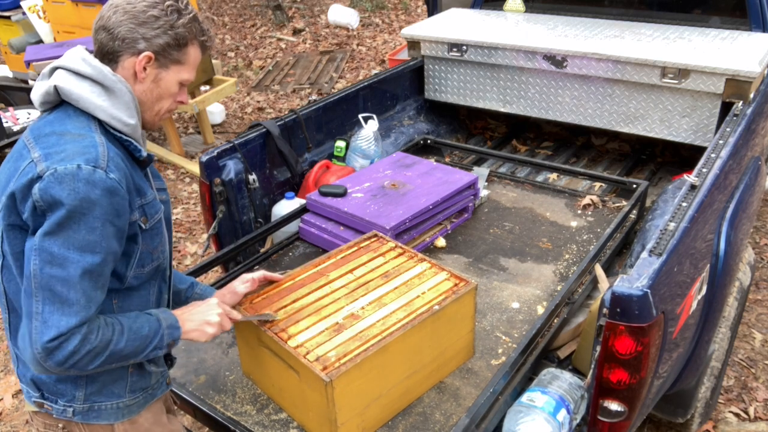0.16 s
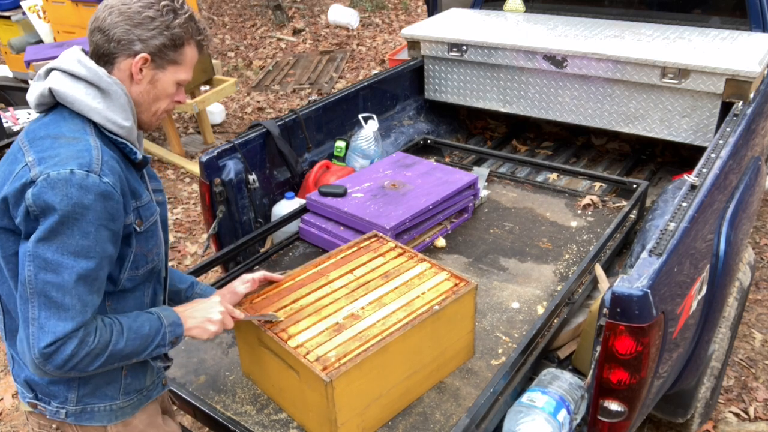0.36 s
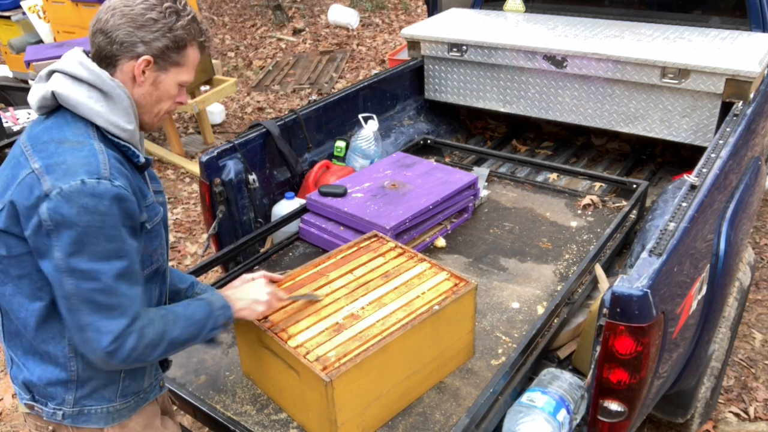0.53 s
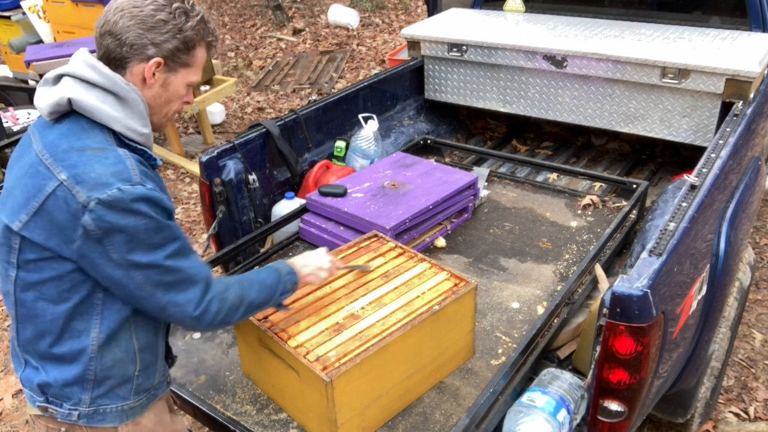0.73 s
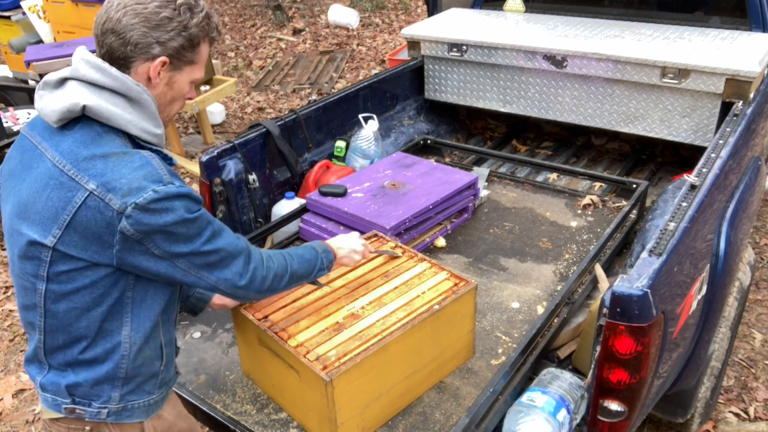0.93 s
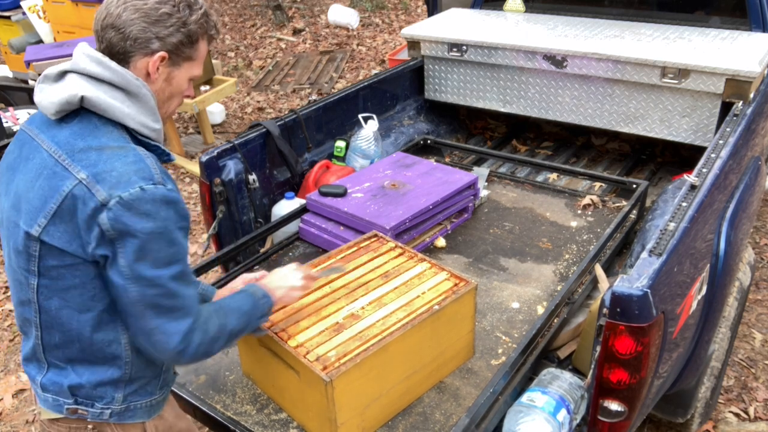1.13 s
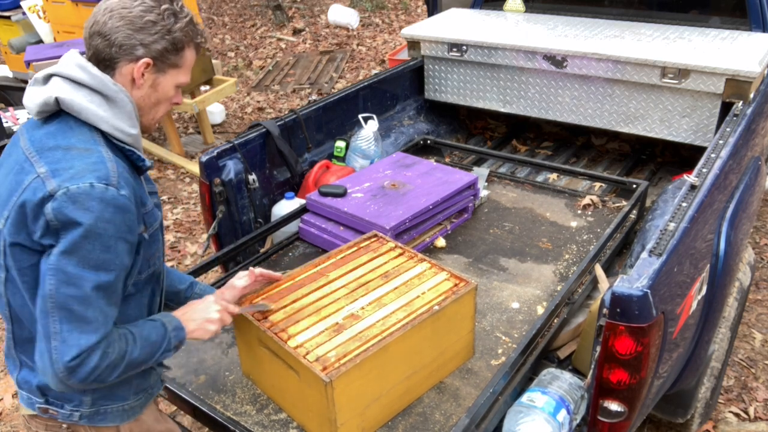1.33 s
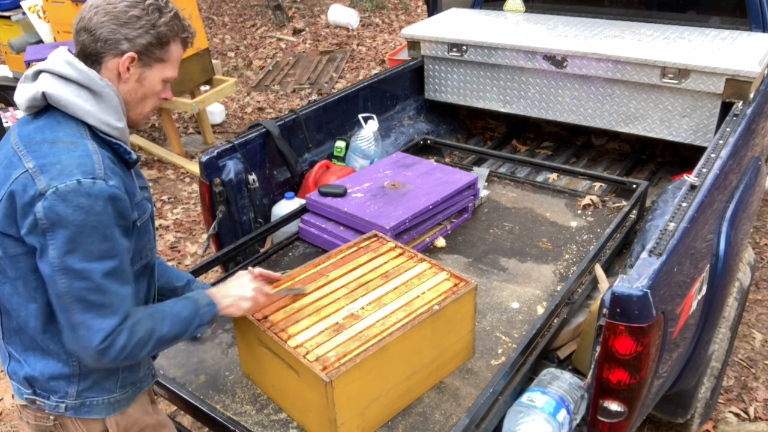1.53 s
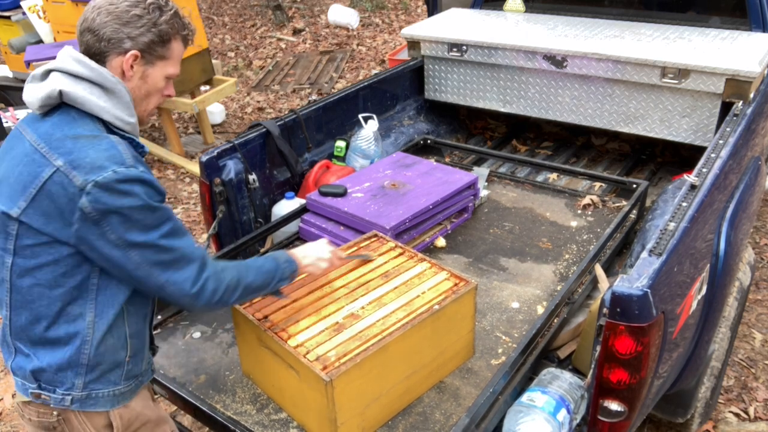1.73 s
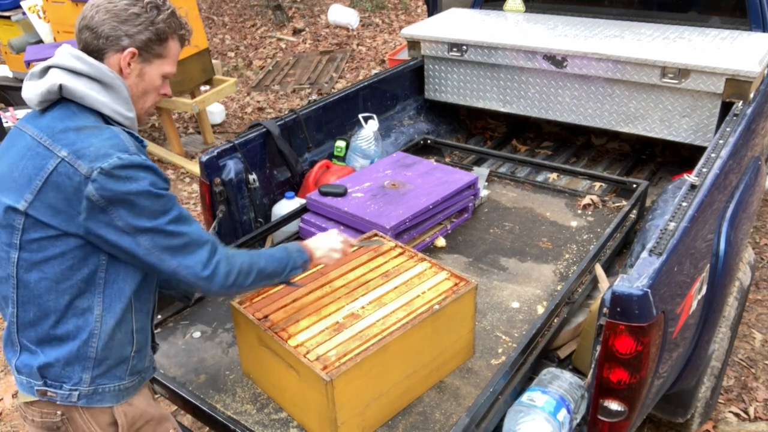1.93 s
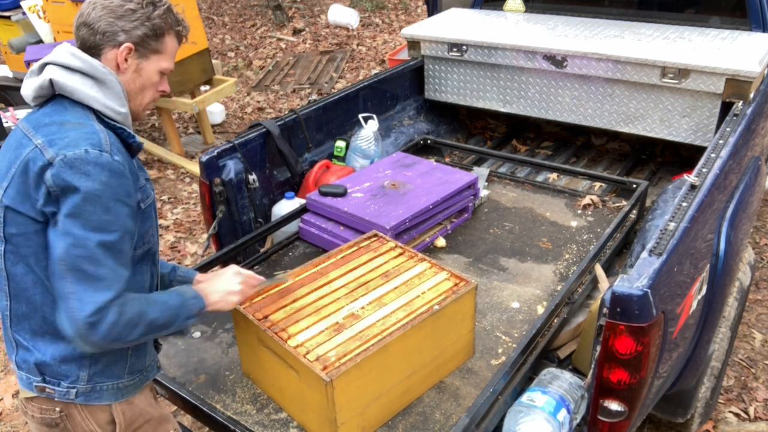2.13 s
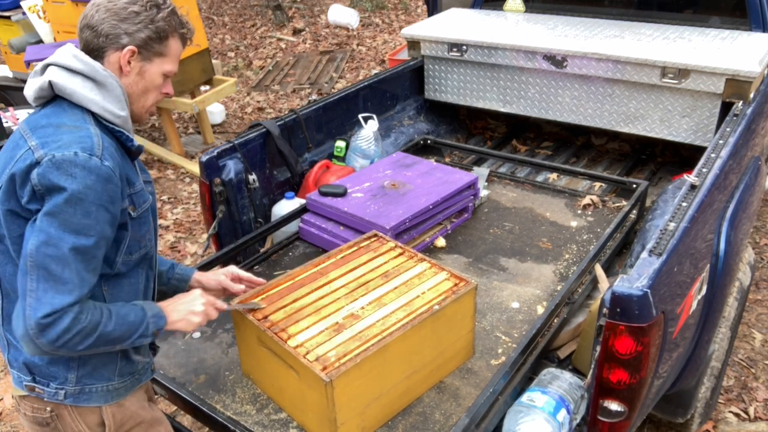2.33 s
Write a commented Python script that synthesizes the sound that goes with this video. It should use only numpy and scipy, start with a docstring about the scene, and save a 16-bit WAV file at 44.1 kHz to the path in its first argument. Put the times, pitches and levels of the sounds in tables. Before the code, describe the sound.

A steel tool scrapes wax off a wooden hive box, close and outdoors. A short rasp at 0.1 seconds leads into a longer one from 0.4 to 0.9, with knocks and a tiny squeak. After a light drag back, another push runs from 1.4 to 1.9, and a last starts around 2.3. Ticks and hollow thuds mark the blade catching, over faint sleeve rustle and low air.

```python
"""A steel hive tool scrapes wax off the top bars of a wooden hive box on a truck bed, outdoors, close to one microphone.
Each push is a dense stream of tiny slips that shakes the box, rasps in the bar and hisses on the blade.
Ticks, cracks and thuds mark the blade landing or catching on lumps; between pushes it drags lightly back.
The frame groans, the blade squeaks, the truck bed booms and rings; behind lie a rustling sleeve and low outdoor air."""
import sys
import numpy as np
from scipy import signal
from scipy.fft import rfft, irfft
from scipy.io import wavfile
from scipy.ndimage import uniform_filter1d

SR = 44100
rng = np.random.default_rng(int(sys.argv[2]) if len(sys.argv) > 2 else 0)


def log_audio(samples):
    """Write samples as a 16-bit WAV file to the path given in sys.argv[1]."""
    # one column per channel
    frames = np.atleast_2d(samples).T
    # limit to full scale, then quantise
    limited = np.clip(frames, -1, 1)
    pcm = np.round(limited * 32767).astype(np.int16)
    wavfile.write(sys.argv[1], SR, pcm)


N = 108794  # length [samples]
T = np.arange(N) / SR  # time [s]


def amp(db):
    """Decibels to gain."""
    return 10 ** (np.asarray(db) / 20)


def unit(x):
    """Scales to rms 1."""
    return x / np.sqrt(np.mean(x ** 2) + 1e-20)


def envelope(points):
    """Gain over time from (time [s], level [dB]) points, held beyond both ends."""
    return amp(np.interp(T, *np.transpose(points)))


def decay(t, t60):
    """Exponential ring-down that falls 60 dB in t60 seconds."""
    return np.exp(-np.log(1000) * t / t60)


def read(points, hz):
    """Reads a table on a log-frequency axis."""
    f, value = np.transpose(points)
    return np.interp(np.log(hz + 1), np.log(f + 1), value)


def add(mix, s, sound):
    """Mixes a sound in at time s."""
    part = mix[max(round(s * SR), 0):][:len(sound)]
    part += sound[:len(part)]


def body(shape, modes=(), place=0, size=16384):
    """Minimum-phase response of energy 1: a broad shape with resonances that depend on where the blade is."""
    hz = np.fft.rfftfreq(size, 1 / SR)
    lift = 1
    for f, width, near, far in modes:
        lift_db = abs(near + (far - near) * place)
        lift = lift + (amp(lift_db) ** 2 - 1) / (1 + (2 * (hz - f) / width) ** 2)
    log_gain = np.log(amp(read(shape, hz)) * np.sqrt(lift))
    both_sides = np.r_[log_gain, log_gain[-2:0:-1]]
    # the Hilbert transform of the log gain gives the causal phase
    spectrum = np.exp(np.conj(signal.hilbert(both_sides)))
    ring = np.fft.ifft(spectrum).real[:size // 2]
    return ring / np.linalg.norm(ring)


def peak_one(ring):
    """Scales a response so that its strongest frequency has gain 1."""
    return ring / abs(rfft(ring)).max()


def through(x, ring):
    """Plays x through an impulse response."""
    return signal.fftconvolve(x, ring)[:N]


def wander(hz):
    """Smooth chance of rms 1, up to a rate."""
    rolloff = np.exp(-(np.fft.rfftfreq(N, 1 / SR) / hz) ** 2)
    return unit(irfft(rfft(rng.standard_normal(N)) * rolloff, N))


def slips(per_s, spread_db):
    """A stream of tiny clicks of random sign and uneven size, rms 1."""
    size = amp(spread_db * np.minimum(rng.exponential(1, N), 4))
    happens = rng.random(N) < per_s / SR
    return unit(size * rng.choice([-1, 1], N) * happens)


BURST_RISE_S = 0.00066


def burst(t60):
    """A brief cluster of fractures as noise, rising fast and dying away."""
    t = np.arange(SR // 10) / SR
    return unit(rng.standard_normal(len(t))) * (1 - np.exp(-t / BURST_RISE_S)) * decay(t, t60)


# colour of the outdoor air: (frequency [Hz], relative level [dB])
AIR_SHAPE = [(20, 1.5), (110, 2.5), (300, -7), (2000, -24), (16000, -37)]
AIR_DB = -49.5  # level about which the swell moves


def air():
    """Low, gently swelling outdoor background: shaped noise."""
    swell_db = 1.6 * wander(12)
    return amp(AIR_DB + swell_db) * through(rng.standard_normal(N), body(AIR_SHAPE))


# rustle of the sleeve: (time [s], level [dB]) before flutter
SLEEVE_LEVEL = [(.08, -62.5), (.14, -47), (.29, -62), (.36, -55.5), (.92, -60), (1.0, -51), (1.27, -54.5),
                (1.36, -58.5), (1.88, -58), (1.95, -51), (2.2, -53.5), (2.31, -65)]
# colour of the cloth: (frequency [Hz], relative level [dB])
CLOTH_SHAPE = [(200, -2), (900, 6), (2000, -6.5), (3500, -4), (5800, -6.5), (7400, 4.5), (8400, -6.5),
               (9500, -11.5), (16000, -17)]


def sleeve():
    """A denim jacket sleeve rubs as the arm swings: many small slips coloured by the cloth."""
    rub = through(slips(per_s=7900, spread_db=3), body(CLOTH_SHAPE))
    flutter = amp(2.5 * wander(31))
    return envelope(SLEEVE_LEVEL) * rub * flutter


# ring time of the truck bed: (frequency [Hz], time to fall 60 dB [s])
BED_RING_TIME = [(120, 0.8), (320, 0.34), (840, 0.04), (6000, 0.012)]
BED_DB = -10.5  # how strongly the bed answers


def truck_bed(x):
    """A short diffuse ring, longest in the bass: noise that dies at its own rate in each band."""
    hz, t, z = signal.stft(rng.standard_normal(SR // 2), SR, nperseg=256)
    fade = decay(t, read(BED_RING_TIME, hz)[:, None]) * (t > 0)
    # every band answers equally strongly
    fade *= amp(BED_DB) / np.sqrt((fade ** 2).mean(1, keepdims=True) * (SR // 2))
    return through(x, signal.istft(z * fade, SR, nperseg=256)[1])


# the arm's weight coming on or off the box: (time [s], level [dB])
WEIGHT_SHIFTS = [(0.051, -38), (.148, -44), (0.979, -39), (1.383, -36.5), (2.28, -40)]
BOOM_HZ, BOOM_T60_S, BOOM_RISE_S = 121, 0.12, 0.0011


def booms():
    """The arm's weight sets the sheet metal under the box into a short low swing."""
    out, t = np.zeros(N), np.arange(SR // 4) / SR
    swing = (1 - np.exp(-t / BOOM_RISE_S)) * decay(t, BOOM_T60_S) * 2 * np.sin(2 * np.pi * BOOM_HZ * t)
    for s, db in WEIGHT_SHIFTS:
        add(out, s, amp(db) * swing)
    return out


# the blade bearing down on the frame:
# (start [s], length [s], low mode level [dB], middle mode level [dB], high mode level [dB])
FRAME_GROANS = [(.765, 0.14, -44, -32, -54), (1.735, .145, -29.5, -34, -36.5),
                (2.332, .14, -40, -45, -47.5)]
# modes of the loose frame: (frequency [Hz])
FRAME_MODES = [336, 602, 810]
FRAME_Q, GROAN_SKEW = 3.8, 0.75  # sharpness of each of two passes; below 1 the swell peaks early


def groans():
    """Slips ring the loose frame's three modes, swelling quickly and easing off."""
    out = np.zeros(N)
    for s, length, *levels in FRAME_GROANS:
        t = np.arange(0, length, 1 / SR)
        swell = np.sin(np.pi * (t / length) ** GROAN_SKEW)
        for hz, db in zip(FRAME_MODES, levels):
            mode = signal.iirpeak(hz, FRAME_Q, fs=SR)
            once = signal.lfilter(*mode, slips(SLIPS_PER_S, SLIP_SPREAD_DB))
            ring = signal.lfilter(*mode, once)
            add(out, s, amp(db) * swell * unit(ring[-len(t):]))
    return out


# brief squeaks of the blade: (time [s], peak level [dB], mean pitch [Hz])
BLADE_SQUEAKS = [(0.769, -32, 7270), (.807, -38, 6200)]
SQUEAK_S, SQUEAK_WAVER = 0.014, 0.015  # length; pitch waver as a fraction


def squeaks():
    """The blade sticks and sings for an instant: a wavering sine."""
    out, t = np.zeros(N), np.arange(0, SQUEAK_S, 1 / SR)
    for s, db, hz in BLADE_SQUEAKS:
        pitch = hz * (1 + SQUEAK_WAVER * wander(600)[:len(t)])
        turns = np.cumsum(pitch) / SR
        add(out, s, amp(db) * np.sin(np.pi * t / SQUEAK_S) * np.sin(2 * np.pi * turns))
    return out


# one list per light drag back: (time [s], level [dB]) before flutter
DRAG_STROKES = [
    [(1.14, -58.5), (1.2, -45.5), (1.32, -42.5), (1.36, -90)],
    [(2.1, -53), (2.135, -48), (2.2, -43.5), (2.24, -46), (2.28, -51)],
]
# dull colour of the drag: (frequency [Hz], relative level [dB])
DRAG_SHAPE = [(80, -7), (300, 3), (1100, 0), (2100, -19.5), (6800, -18), (10000, -36)]


def dragging():
    """The blade slides back over the wax with little weight on it: sparser, fluttering slips."""
    level = sum(envelope(drag) * (T > drag[0][0]) * (T < drag[-1][0]) for drag in DRAG_STROKES)
    flutter = amp(2 * wander(45.8))
    return through(level * slips(per_s=1500, spread_db=5.0) * flutter, body(DRAG_SHAPE))


CRACK_T60_S, CRACK_OCTAVES = 0.035, 0.73  # decay; bandwidth


def crack(hz):
    """A burst of breaking wax and wood fibre, strongest around one frequency."""
    x = burst(CRACK_T60_S)
    octaves = np.log2((np.fft.rfftfreq(len(x), 1 / SR) + 1) / hz)
    return irfft(rfft(x) / np.sqrt(1 + (2 * octaves / CRACK_OCTAVES) ** 2), len(x))


# blade landing or catching, levels as drive before the bodies: (time [s], thud level [dB],
# thud pitch [Hz], wood crack level [dB], crack and ring pitch [Hz], steel tick level [dB])
BLADE_KNOCKS = [(0.05, -19.5, 382, -31.5, 694, -33), (0.07, -25.5, 427, -45, 800, -63),
                (.148, -22.5, 208, -49, 1090, -36), (0.193, -23, 227, -29.5, 2500, -29),
                (.45, -28, 253, -46, 1100, -54), (.514, -19.5, 262, -34, 1196, -45),
                (.68, -16, 443, -20.5, 1105, -21), (0.7031, -13.5, 431, -18.5, 1098, -21),
                (0.7583, -10, 448, -22, 2850, -20.5), (.824, -12, 409, -25.5, 670, -19),
                (.832, -26, 218, -22.5, 2326, -28), (.843, -16, 222, -21.5, 614, -38),
                (0.978, -22, 172, -38.5, 970, -36), (1.005, -30.5, 235, -56, 900, -56),
                (1.039, -29.5, 189.3, -64, 900, -56), (1.302, -26, 650, -26, 2297, -21),
                (1.383, -31, 402, -23.5, 920, -17), (1.387, -22, 385, -27.5, 1122, -30),
                (1.412, -20.5, 668, -30.5, 970, -35), (1.438, -25.5, 222, -33.5, 1020, -48),
                (1.47, -20, 657, -33, 1240, -38), (2.13, -37, 434, -38, 764, -49),
                (2.222, -28, 510, -30.5, 840, -47), (2.279, -23.5, 363, -31, 1122, -25.5),
                (2.29, -22, 350, -32, 956, -34)]
# lone sharp ticks of the blade or of snapping wax: (time [s], drive level [dB])
LONE_TICKS = [(.048, -24.5), (0.173, -24), (0.182, -20.5), (1.1324, -29), (2.146, -31), (2.2038, -24.5)]
# colour of the ticks: (frequency [Hz], relative level [dB])
TICK_SHAPE = [(1500, -19.5), (3200, -6.5), (5500, -2), (6600, 7), (9200, -14.5), (16000, -39)]
THUD_DELAY_S, THUD_RISE_S, THUD_T60_S = 0.00226, 0.0013, 0.034
THUD_RING = 0.31  # how much of the thud rings the box
PUSH_CYCLES, PUSH_DB = 0.11, -6  # thud cycles until the push peaks; drive relative to the thud
CRACK_RING_DB, CRACK_RING_T60_S = -4, .05  # relative to the crack
TICK_T60_S, LONE_TICK_T60_S = 0.0071, 0.0077


def knocks():
    """The steel ticks, the bar cracks and rings, then the frame thuds and its push rings the box; lone ticks have no thud."""
    thuds, pushes, cracks, rings, ticks = np.zeros((5, N))
    t = np.arange(SR // 5) / SR
    rise = 1 - np.exp(-t / THUD_RISE_S)
    swing, woody = rise * decay(t, THUD_T60_S), rise * decay(t, CRACK_RING_T60_S)
    swing, woody = swing / swing.max(), woody / woody.max()
    for s, thud_db, thud_hz, crack_db, crack_hz, tick_db in BLADE_KNOCKS:
        u = t * thud_hz / PUSH_CYCLES
        add(thuds, s + THUD_DELAY_S, amp(thud_db) * swing * np.sin(2 * np.pi * thud_hz * t))
        add(pushes, s + THUD_DELAY_S, amp(thud_db + PUSH_DB) * u * np.exp(-u))
        add(cracks, s, amp(crack_db) * crack(crack_hz))
        add(rings, s, amp(crack_db + CRACK_RING_DB) * woody * np.sin(2 * np.pi * crack_hz * t))
        add(ticks, s, amp(tick_db) * burst(TICK_T60_S))
    for s, tick_db in LONE_TICKS:
        add(ticks, s, amp(tick_db) * burst(LONE_TICK_T60_S))
    box, bar = body(BOX_SHAPE, BOX_RESONANCES, place=0.04), body(BAR_SHAPE)
    out = amp(-5.5) * thuds + 2 * THUD_RING * through(thuds, peak_one(box))
    out += through(pushes, box)
    out += through(cracks, body(BAR_SHAPE, BAR_RESONANCES, place=0.55))
    out += through(rings, peak_one(bar))
    return out + through(ticks, body(TICK_SHAPE))


PATCH_DB, PATCH_HZ, PATCH_S = 2.4, 220, .035  # rms depth; approximate width and length of a patch


def patchy(x):
    """The shifting contact lets narrow bands swell and fade at random."""
    hz, t, z = signal.stft(x, SR, nperseg=512, noverlap=384)
    field = rng.standard_normal(z.shape[::-1]).T
    field = uniform_filter1d(field, max(round(PATCH_HZ / hz[1]), 1), axis=0)
    field = uniform_filter1d(field, max(round(PATCH_S / t[1]), 1), axis=1)
    gain = unit(amp(PATCH_DB * unit(field)))
    return signal.istft(z * gain, SR, nperseg=512, noverlap=384)[1][:N]


# one list per push: (time [s], box rumble level [dB], bar rasp level [dB], blade hiss level [dB],
# place along the bar [0 near - 1 far])
PUSH_STROKES = [
    [(.12, -72, -76, -75, 0), (.15, -39, -44.5, -47.5, 0.029), (.178, -35, -36.5, -48, 0.062),
     (.205, -26.5, -45, -50, 0), (.23, -44.5, -48, -62, 0.0092), (.3, -46.5, -57.5, -78, 0.2),
     (.36, -41, -55, -60, 0.18), (.43, -59, -54, -76, 0.037)],
    [(.42, -48.5, -57, -51, 0.54), (.46, -32.5, -44.5, -53, 0.04), (.5, -35.5, -36.5, -37.5, 0.14),
     (.56, -38, -35.5, -38.5, 0.067), (.65, -33, -40, -41, 0.45), (.74, -37.5, -41, -41.5, 1),
     (.8, -40, -37.5, -40.5, 0.83), (.89, -31, -42.5, -52.5, 0.35), (.935, -51, -67, -71, 0.93)],
    [(1.385, -32.5, -62, -56, 0.67), (1.44, -37.5, -45.5, -49, 0.17), (1.48, -31.5, -38, -39.5, 0.25),
     (1.54, -35, -38, -37.5, 0.33), (1.58, -35, -33, -37, 0.66), (1.63, -43.5, -36.5, -38.5, 1),
     (1.71, -41, -36, -37.5, 1), (1.78, -32, -32, -37, 0.88), (1.85, -39.5, -43.5, -51.5, 0.78),
     (1.89, -40.5, -67, -88, 0.69)],
    [(2.32, -52, -58.5, -59.5, 0.069), (2.41, -34.5, -37.5, -40, 0.056),
     (2.445, -34.5, -30.5, -35.5, 0.082), (2.475, -31, -30.5, -38, 0.19)],
]
# resonances of box, top bar and blade: (frequency [Hz], width [Hz],
# lift with the blade at the near end [dB, sign ignored at the ends], lift at the far end [dB])
BOX_RESONANCES = [(119, 11.5, 5.5, 17), (170.8, 24.3, 10, 12.3), (242.5, 10.3, 14, 2.4), (327, 27, -5, 10),
                  (385.7, 8.9, 5, 15), (419.7, 13.2, 18.5, 6.5), (630, 110, -6.5, 13.4), (646, 22, 5, 10.5)]
BAR_RESONANCES = [(869, 47, 6.8, 1.8), (1072.5, 10.2, 15.7, 0.96), (1192, 33, 10, 4.2),
                  (1980, 430, 4.9, 8.3), (2800, 330, 0.71, 13.2), (3210, 300, 5, 13.3),
                  (3790, 340, 0.84, 16.8)]
BLADE_RESONANCES = [(5080, 520, 9.7, 4.6), (6436, 320, 17.8, 16.1), (7520, 140, 12.7, 11),
                    (8370, 420, 1, 12.4), (13900, 1100, 6, 16.5)]
# broad colours of box, top bar and blade: (frequency [Hz], relative level [dB])
BOX_SHAPE = [(30, -46), (80, -10), (130, -9.5), (250, -1), (450, -7), (700, -11), (1000, -13),
             (1800, -44.5)]
BAR_SHAPE = [(350, -28.5), (700, 2), (1000, 3.5), (1600, -2), (2500, -7.5), (3800, -7.5), (4400, -32),
             (8000, -39)]
BLADE_SHAPE = [(2000, -53), (4300, -1), (5600, -6), (7200, -1), (8200, -4.5), (9200, -13.5), (11000, -13.5),
               (12500, -23), (16000, -20)]
SLIPS_PER_S, SLIP_SPREAD_DB = 12000, 2.5
CHATTER_DB, CHATTER_HZ = 1.5, 110  # rms depth; rate limit


def scraping():
    """Chattering slips drive box, bar and blade, whose resonances shift as the blade travels."""
    chatter, out = amp(CHATTER_DB * wander(CHATTER_HZ)), np.zeros(N)
    bodies = [(BOX_SHAPE, BOX_RESONANCES), (BAR_SHAPE, BAR_RESONANCES), (BLADE_SHAPE, BLADE_RESONANCES)]
    for k, (shape, modes) in enumerate(bodies):
        drive = unit(slips(SLIPS_PER_S, SLIP_SPREAD_DB) * chatter)
        near, far = np.zeros((2, N))
        for stroke in PUSH_STROKES:
            s, *levels, place = np.transpose(stroke)
            force = drive * amp(np.interp(T, s, levels[k])) * (T >= s[0]) * (T < s[-1])
            along = np.clip(np.interp(T, s, place), 0, 1)
            near += force * (1 - along)
            far += force * along
        out += through(near, body(shape, modes, 0)) + through(far, body(shape, modes, 1))
    return out


def scene():
    """The tool on the box, the ring of the truck bed, sleeve and air."""
    tool = patchy(scraping() + dragging()) + knocks() + groans() + booms() + squeaks()
    return (tool + truck_bed(tool) + sleeve() + air())[None]


EDGE_HZ = 15850  # upper edge


def record(dry):
    """The recorder's band limit: a steep low-pass."""
    lowpass = signal.firwin(511, EDGE_HZ, window=("kaiser", 9), fs=SR)
    return signal.oaconvolve(dry, lowpass[None], "same")


dry = scene()
out = record(dry)
log_audio(out)
```